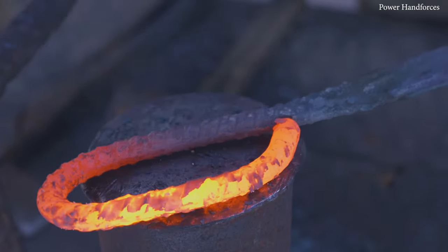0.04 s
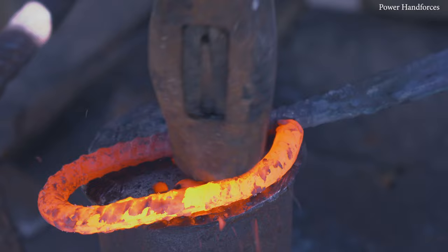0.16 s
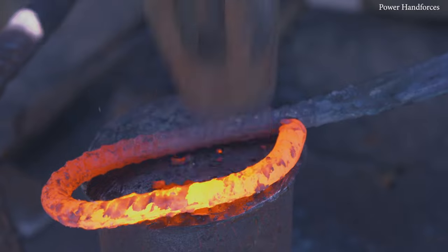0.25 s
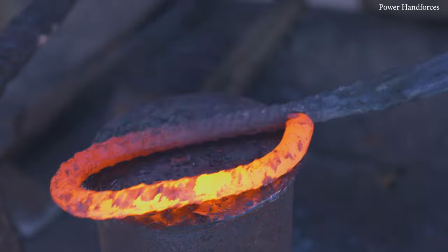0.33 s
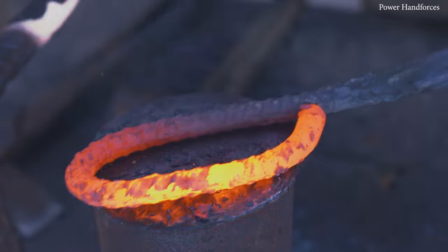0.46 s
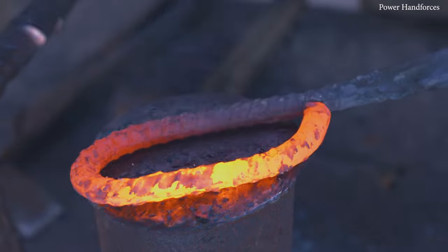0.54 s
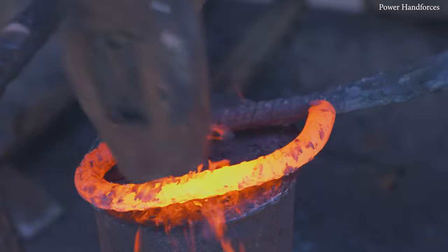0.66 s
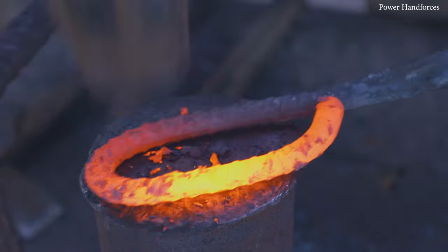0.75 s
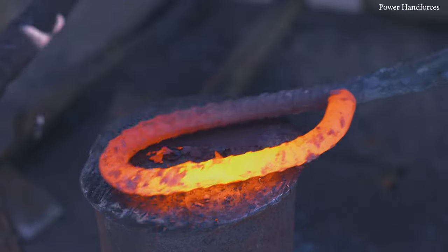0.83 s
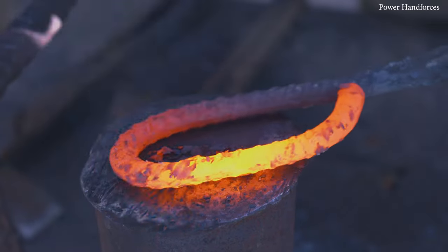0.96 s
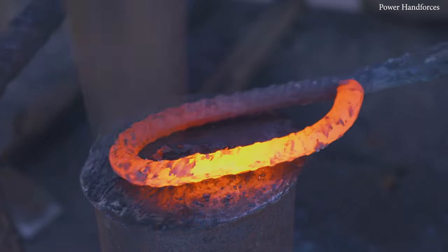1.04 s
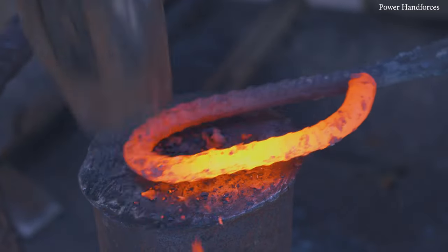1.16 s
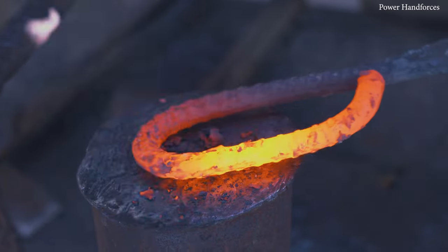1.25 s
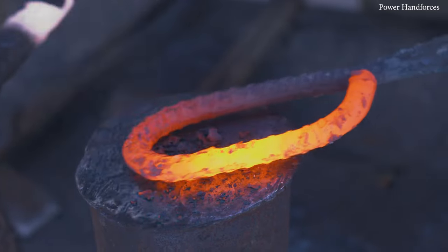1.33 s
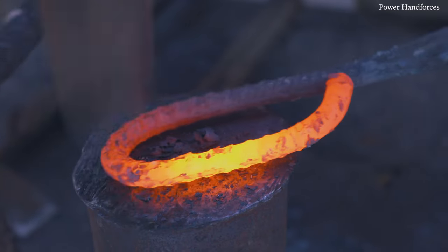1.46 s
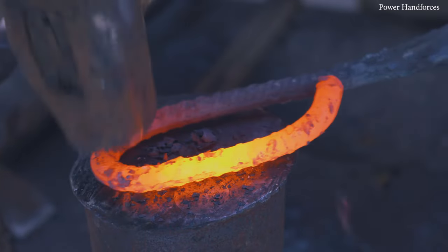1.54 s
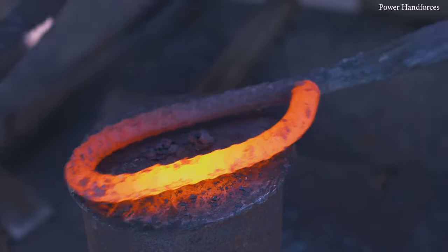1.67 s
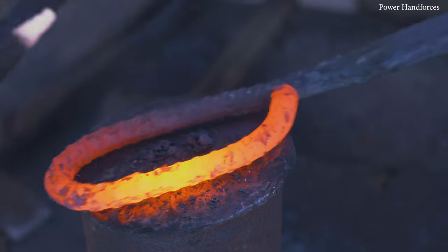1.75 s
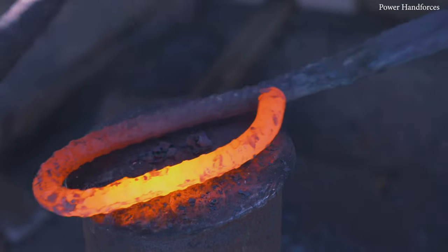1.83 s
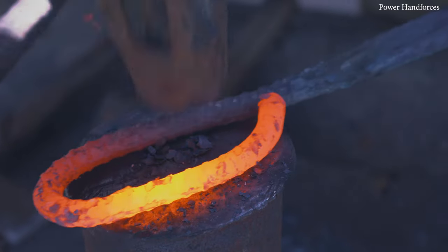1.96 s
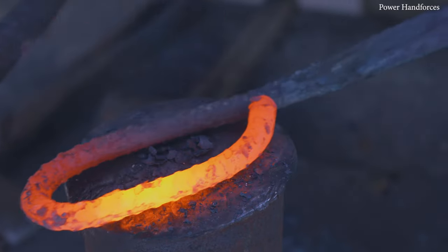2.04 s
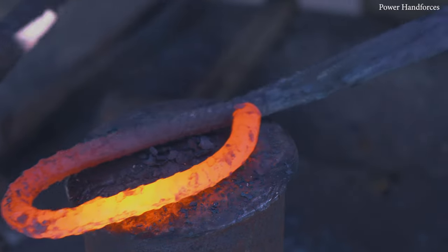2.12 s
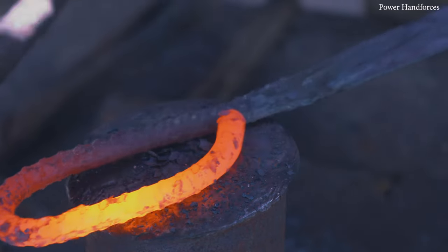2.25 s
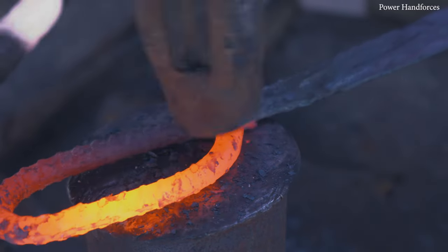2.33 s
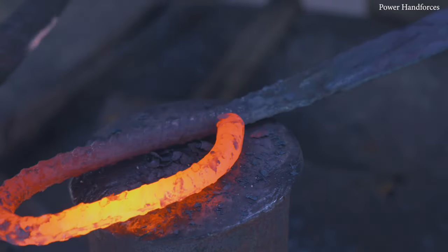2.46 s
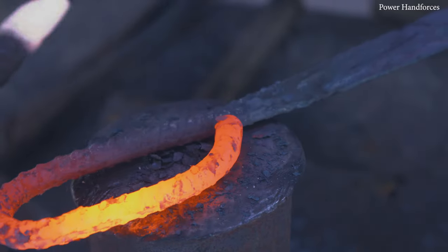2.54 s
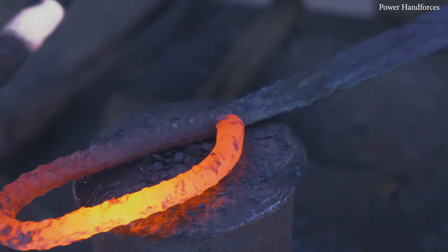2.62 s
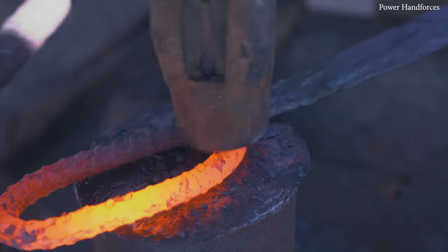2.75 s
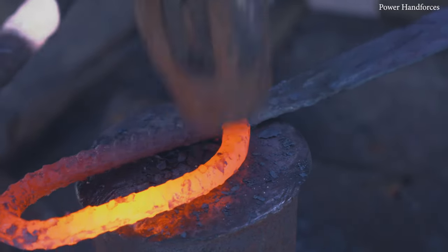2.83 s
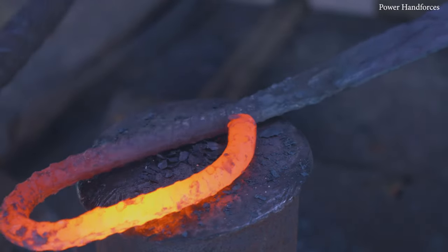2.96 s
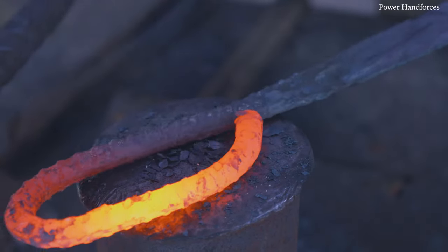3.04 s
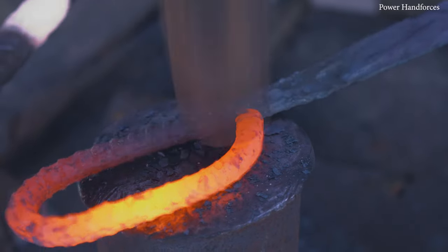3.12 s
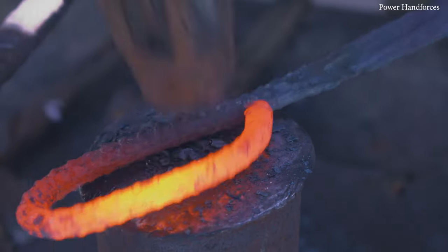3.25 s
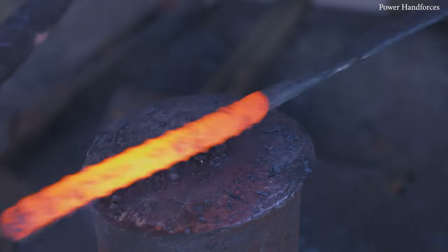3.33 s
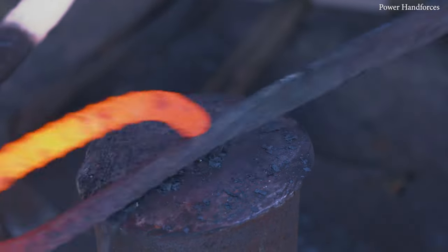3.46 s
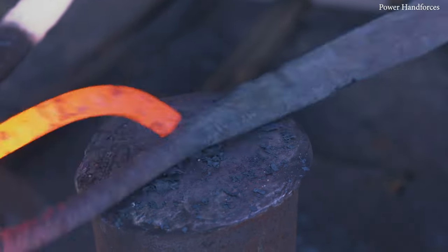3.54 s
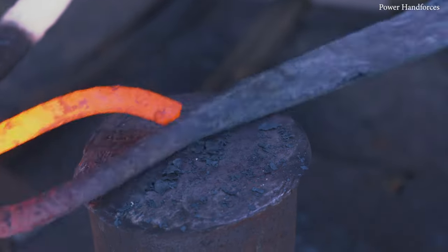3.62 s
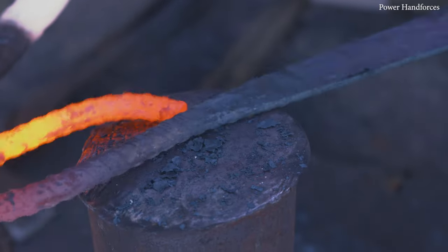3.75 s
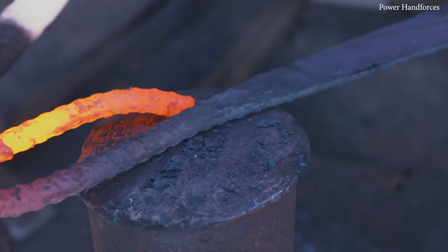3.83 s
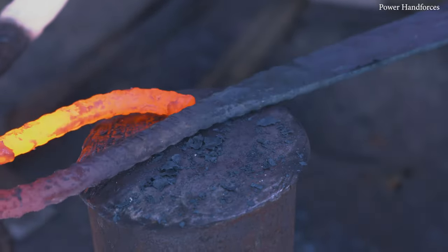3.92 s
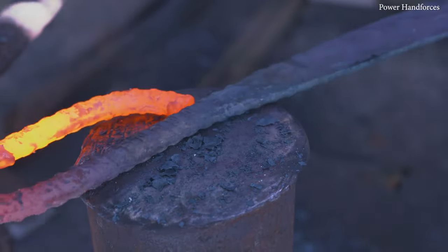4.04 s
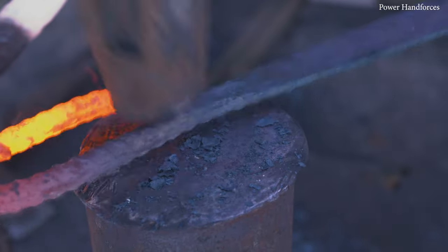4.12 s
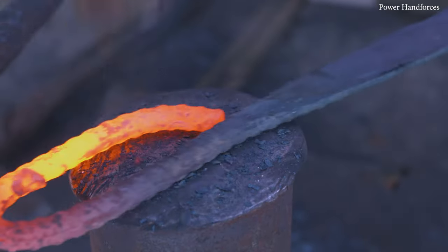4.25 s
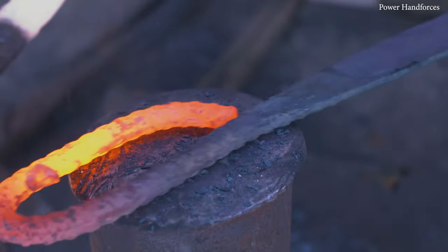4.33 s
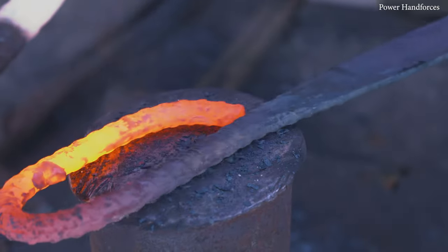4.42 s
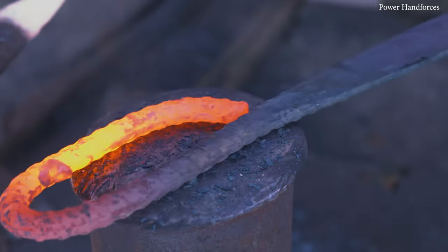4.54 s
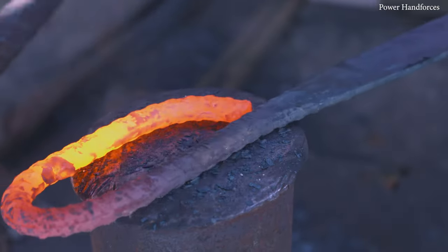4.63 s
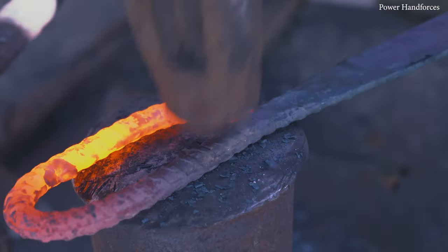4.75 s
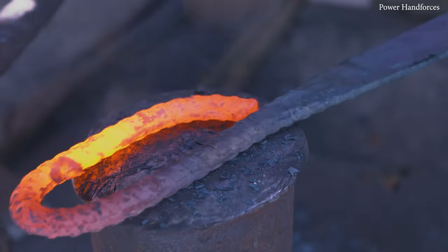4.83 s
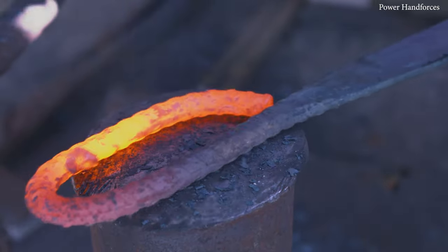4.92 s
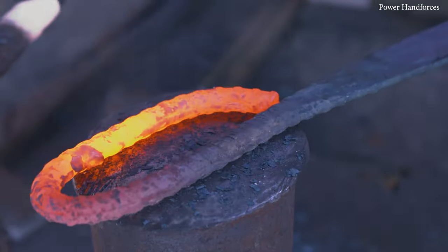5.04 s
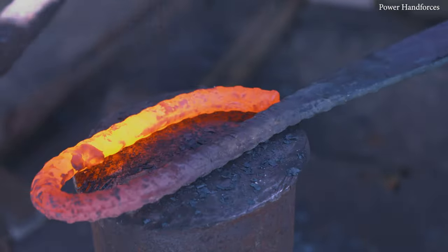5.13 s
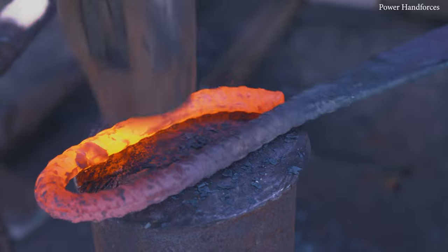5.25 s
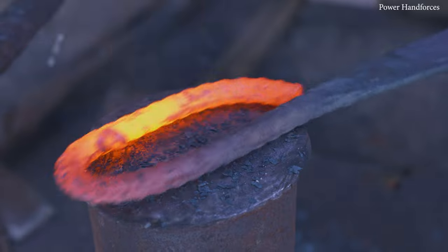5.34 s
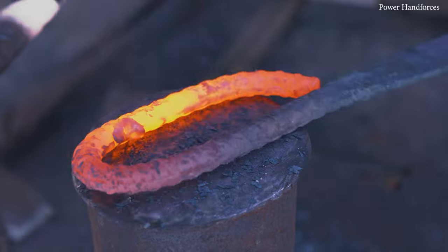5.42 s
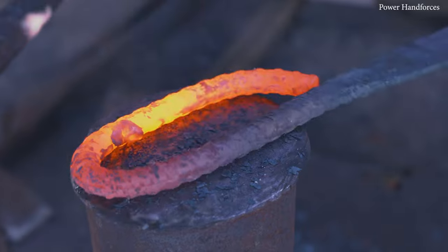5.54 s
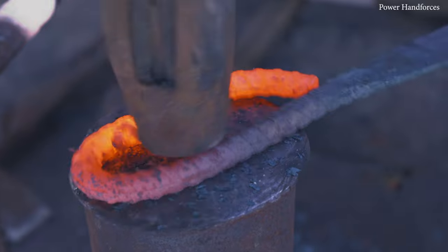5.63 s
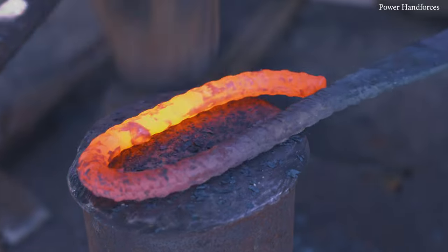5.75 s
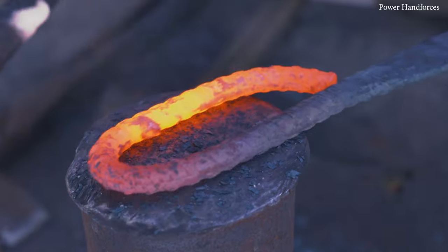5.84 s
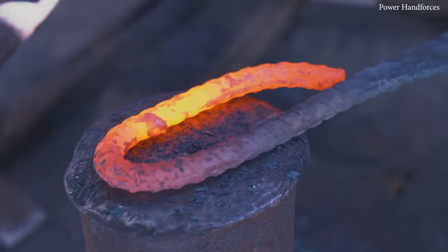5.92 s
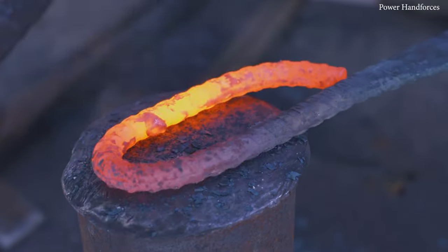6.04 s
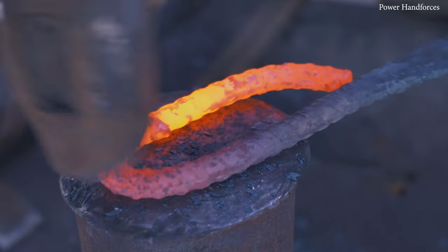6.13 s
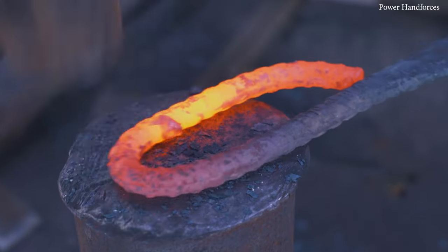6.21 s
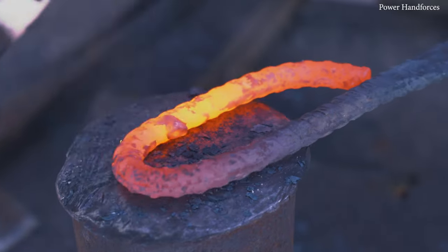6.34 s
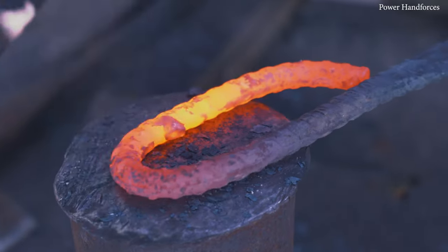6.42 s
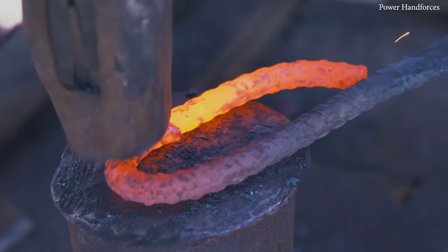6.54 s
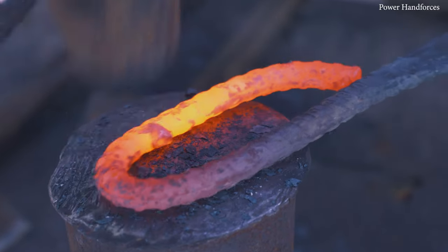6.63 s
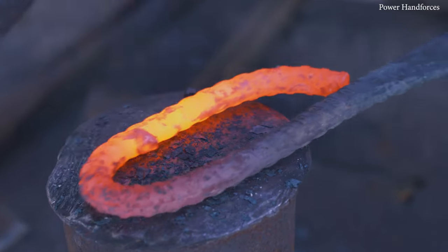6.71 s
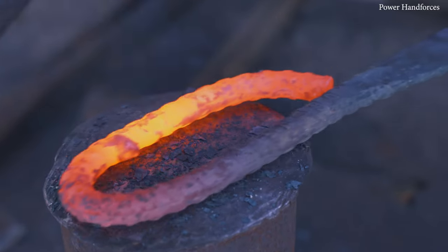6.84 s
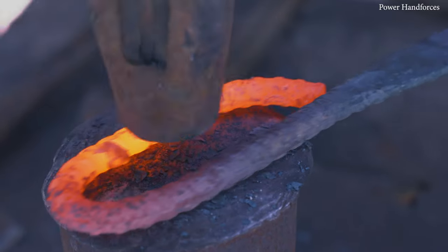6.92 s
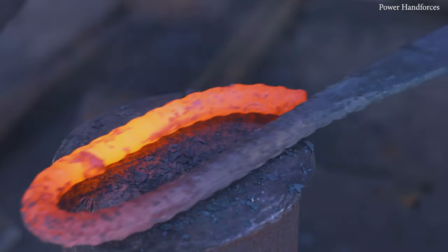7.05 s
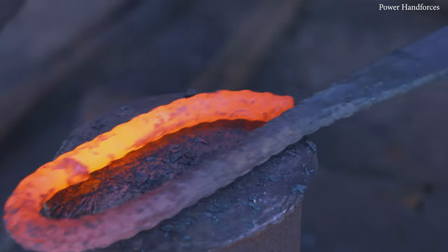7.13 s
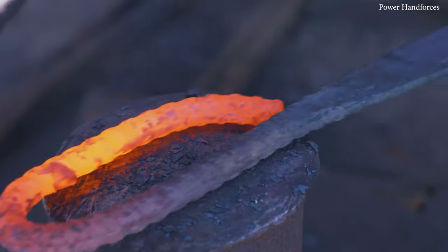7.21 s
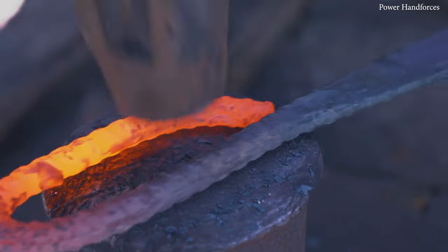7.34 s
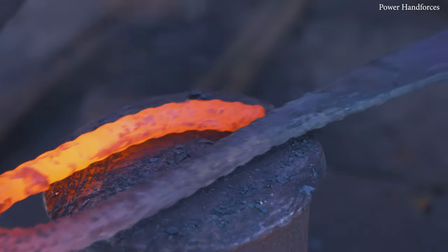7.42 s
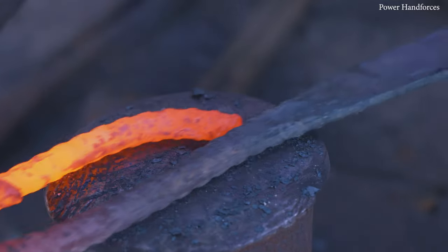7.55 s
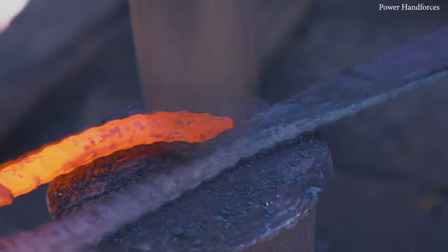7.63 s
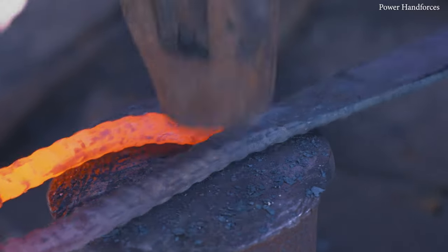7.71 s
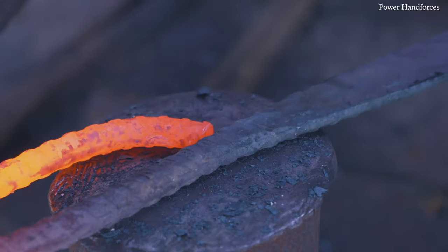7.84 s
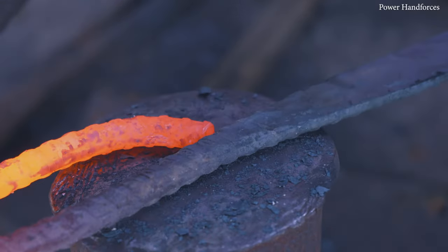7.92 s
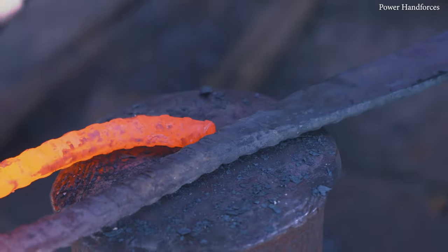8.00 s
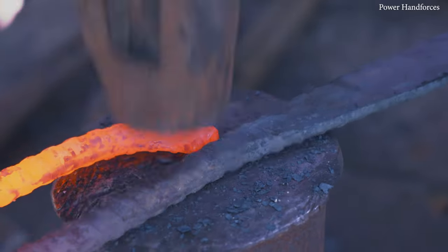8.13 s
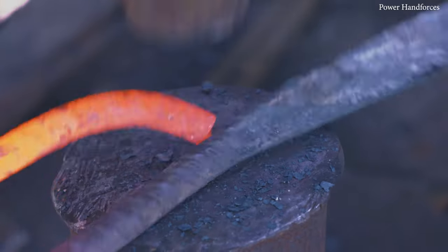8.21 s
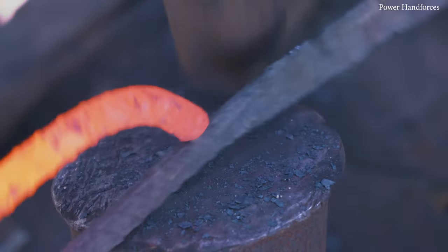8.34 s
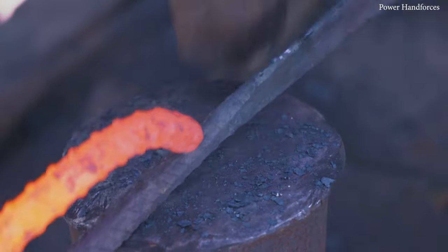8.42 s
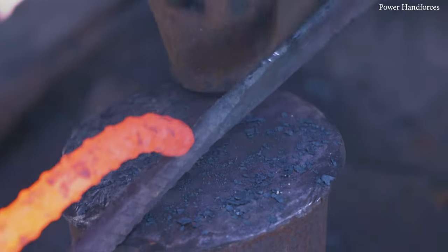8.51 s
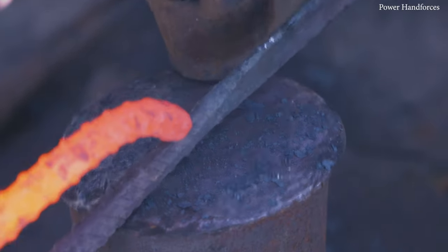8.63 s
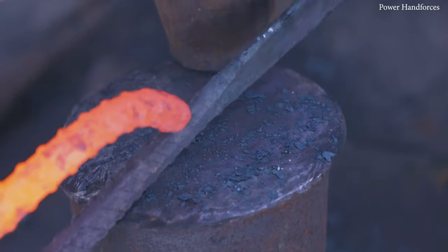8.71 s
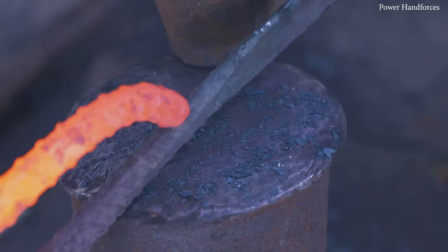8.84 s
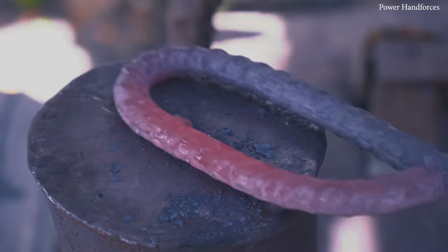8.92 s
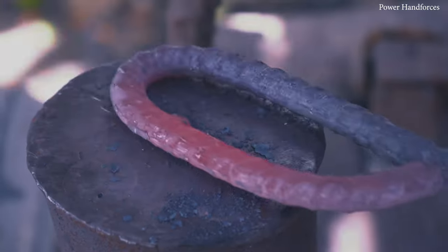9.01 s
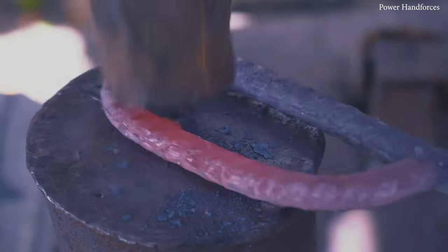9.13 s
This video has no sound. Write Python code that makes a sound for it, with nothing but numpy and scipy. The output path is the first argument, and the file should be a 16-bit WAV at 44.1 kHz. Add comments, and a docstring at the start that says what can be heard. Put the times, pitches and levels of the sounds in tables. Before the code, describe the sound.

Close up, a hand hammer beats a glowing steel loop on a solid iron stake, a little over two blows a second. Each is a hard crack with a short metallic clang, low thud and bright wash under a shed roof. The bar rattles and scrapes between blows, with one longer pause when it is turned. Three quick clinks of cold steel follow, then a soft fading noise over faint yard air and insects.

```python
"""A faint tone slides down as a hand hammer begins to flatten a red-hot steel loop on a round stake under a shed roof.
Each blow is a noise crack plus damped modes; diffuse reverberation turns it into a bright wash, with a low thud.
Between blows the bar rattles in bursts of filtered grit, knocks as damped tones, and loose scale hisses.
Near the end the cold shank clinks three times, then a broad noise wash sets in abruptly and sinks.
Distant yard noise and a fluttering narrow band of insects, both filtered noise, last throughout."""
import sys
import numpy as np
from scipy import signal
from scipy.fft import rfft, irfft, next_fast_len
from scipy.io import wavfile
from scipy.ndimage import uniform_filter1d

SR = 44100
rng = np.random.default_rng(int(sys.argv[2]) if len(sys.argv) > 2 else 0)


def digitize_waveform(pressure):
    """Quantize a signal to 16-bit integers and store it at the path in sys.argv[1].

    Rows of a 2-D input are taken as channels; values are limited to [-1, 1].
    """
    field = np.atleast_2d(pressure).T
    bounded = np.clip(field, -1, 1)
    quanta = np.round(bounded * 32767).astype(np.int16)
    wavfile.write(sys.argv[1], SR, quanta)


N = 404397
SPAN = 24576  # longest single response, in samples
LOW_CUT_HZ = 150

# The bar rattles and scrapes on the stake. Each row: start in seconds, level in dB, brightness in dB per octave.
RATTLE_EVENTS = [(0.487, -46, -0.5), (0.527, -39, -0.7), (0.944, -38.5, 2), (0.987, -32, -1.5),
                 (1.007, -31.5, 2.5), (1.046, -26, 2.2), (1.085, -32.5, 0), (1.4332, -42.5, 3),
                 (1.467, -44.5, 1), (1.5301, -33, 1.5), (1.9551, -34, -1), (1.9705, -38.5, 7),
                 (3.3209, -30, -5.5), (3.69, -45, 0.6), (3.726, -45, 0.5), (3.8, -51.5, 5),
                 (3.8876, -43.5, 1.5), (3.929, -47.5, 0.6), (4.015, -53, 2), (4.3185, -21, -3.5),
                 (4.596, -48.5, 3.5), (4.6259, -48, -0.7), (4.668, -48, -4), (4.708, -47, -2.5),
                 (5.483, -42, -1), (5.519, -43.5, 0.5), (5.644, -68, 3), (6.903, -47.5, 3),
                 (7.278, -51.5, -1), (7.645, -47.5, 0.6), (8.0218, -53.5, 3), (8.2207, -22.5, 0.5),
                 (8.778, -55, 7)]
# Spectrum of grit and scale. Each row: frequency in Hz, relative level in dB.
GRIT_SPECTRUM = [(350, -57), (600, -8), (814, -15.5), (1720, -6.5), (2210, -4.5), (7800, -1),
                 (15200, -21.5), (15800, -8), (16500, -68)]


def blows():
    """Impact on hot steel: a brighter blow glances off harder steel, with less thud and a longer wash."""
    # Each row: start in seconds, crack energy in dB, wash level in dB, clang centre in Hz,
    # brightness in dB per octave.
    blow_rows = [(0.26, 6, -26, 7260, -0.5), (0.773, 11, -25.5, 3150, -1.86), (1.213, 7, -25.5, 5420, 0),
                 (1.629, 5, -22.5, 5250, 0.5), (2.019, 10.5, -22, 3160, 5.5), (2.434, 8, -26.5, 7560, 0),
                 (2.883, 14, -23, 6750, 1.5), (3.284, 9.5, -25, 6890, -0.5), (4.257, 10.5, -20.5, 7240, 1),
                 (4.813, 7, -23, 7000, 1.5), (5.3, 10.5, -25, 6380, 2.5), (5.768, 10, -21.5, 5985, 2.5),
                 (6.231, 10.5, -24, 5460, 1), (6.644, 7.5, -24, 6740, 2.5), (7.031, 7, -31, 5870, -1),
                 (7.405, 9, -26.5, 7120, 3), (7.792, 9, -24, 6230, 3), (8.189, 8.5, -22.5, 6340, 6)]
    # Spectrum of the hot blow. Each row: frequency in Hz, relative level in dB.
    hot_spectrum = [(59, -41), (100, -15), (262, -16.5), (331, 2), (376, -7.5), (655, -4.5), (1680, -11),
                    (2210, -4), (2800, -8.5), (7170, -7), (13600, -33), (15100, -38), (16500, -60)]
    # Modes of hammer and stake. Each row: frequency in Hz, relative level in dB, undamped t60 in seconds.
    stake_modes = [(2040, -17, 0.44), (2218, -6, 0.36), (4150, -9, 0.15), (5030, -5, 0.63),
                   (5180, 3.5, 0.16), (5547, 9.5, 0.34), (6000, -19, 0.14), (5960, 10, 0.15),
                   (6306, 6, 0.26), (6200, -19, 0.15), (6770, 10.5, 0.14), (7000, -12, 0.14),
                   (7200, -19, .22), (7380, 0, 0.14), (7470, -0.5, 0.27), (7640, -13, 0.19),
                   (8170, -11, 0.14), (8470, -8, 0.12), (9300, -5, 0.098), (9600, -23, 0.18),
                   (10360, -18, 0.13), (11700, -19, 0.15), (13200, -27, .15)]
    events = []
    for s, crack_db, wash_db, centre_hz, bright in blow_rows:
        thud_db = -10 - 0.9 * bright
        thud_db += 0.44 * (wash_db + 23.5)  # a weaker blow thuds less
        loop_db = wash_db - 11.5
        decay = 0.96 + 0.053 * bright  # factor on the shed's decay times
        events.append((s, crack_db, wash_db, thud_db, loop_db, centre_hz, bright, decay))
    return strikes(events, hot_spectrum, stake_modes, ring_db=-4.5, damping=0.13,
                   direct_ring_db=21, scatter_db=5)


def clinks():
    """Modal ringing of cold steel: the shank drops and bounces, ringing around the same centre each time."""
    # Each row: start in seconds, crack energy in dB, wash level in dB, thud level in dB,
    # brightness in dB per octave.
    clink_rows = [(8.494, 11, -22, -12, 2), (8.595, 12, -26, -16, 0.1), (8.647, 4.5, -32, -17.5, -1.8)]
    # Spectrum of the cold impact. Each row: frequency in Hz, relative level in dB.
    cold_spectrum = [(59, -46), (100, -8), (324, -6), (1680, -2.5), (1990, -1.5), (2520, -1.5), (4680, -8),
                     (7480, -22), (11000, -55), (13600, -35), (16500, -88)]
    # Modes of cold flat steel. Each row: frequency in Hz, relative level in dB, undamped t60 in seconds.
    shank_modes = [(1480, -19, 0.16), (1800, -13, 0.098), (1950, -0.5, 0.18), (1980, -4, 0.087),
                   (2510, -14, .1), (2860, -20, 0.13), (3270, -15, .12), (3780, -8, .15), (4730, 3, 0.16),
                   (4870, -6, 0.2), (5630, 0.5, 0.21), (7300, -1, 0.28), (8080, -6, 0.21),
                   (9200, -12.5, 0.19), (12220, -24, .15), (13200, -16, .2)]
    centre_hz, decay = 1970, 0.66
    events = [(s, crack_db, wash_db, thud_db, wash_db - 24, centre_hz, bright, decay)
              for s, crack_db, wash_db, thud_db, bright in clink_rows]
    return strikes(events, cold_spectrum, shank_modes, ring_db=-6.5, damping=0.4,
                   direct_ring_db=29.5, scatter_db=3.0)


def strikes(events, spectrum, modes, ring_db, damping, direct_ring_db, scatter_db):
    """Superposition of paths: crack and ring arrive directly, ring and clang through the shed, thud below."""
    # Modes of the bent bar. Each row: frequency in Hz, relative level in dB, undamped t60 in seconds.
    loop_modes = [(2684, -7, 0.24), (2780, -32, 0.16), (3168, 9, 0.19), (3420, -5, 0.16), (3645, 5, 0.25)]
    track = np.zeros((2, N + 2 * SPAN))
    for s, crack_db, wash_db, thud_db, loop_db, centre_hz, bright, decay in events:
        struck = emphasised(modes, centre_hz)
        ring = amp(wash_db + ring_db) * ringing(struck, damping, scatter_db)
        ring += amp(loop_db) * ringing(loop_modes, 0.21, scatter_db=2.5)
        # first touch comes 1 ms ahead, so the full blow falls on s
        add(track, s - .001, amp(crack_db) * crack(spectrum, bright + 2.5))
        add(track, s, amp(direct_ring_db) * ring[None])

        into_shed = ring.copy()
        shock = clang(spectrum, bright, centre_hz)
        into_shed[:len(shock)] += amp(wash_db) * shock
        wash = signal.fftconvolve(shed(decay, build_s=.009), into_shed[None], axes=1)
        add(track, s, wash)
        add(track, s, amp(thud_db) * thud())
    return track[:, :N]


def crack(spectrum, tilt_db):
    """Impulsive contact noise: each arrival is a sharp onset decaying with a 0.5 ms time constant."""
    # First touch, full blow, then floor and nearest post answer. Each row: delay in seconds, level in dB.
    arrivals = [(0, -18), (.001, 0), (.0026, -4), (.004, -11)]
    t = np.arange(1024) / SR
    shape = sum(amp(db) * (t >= delay) * np.exp(-np.abs(t - delay) / .0005) for delay, db in arrivals)
    contact = noise_pair(1024, flat) * shape
    contact /= np.linalg.norm(contact)
    return signal.fftconvolve(contact, causal(spectrum, tilt_db)[None], axes=1)


def clang(spectrum, tilt_db, centre_hz):
    """High modal density acts as decaying noise: a plain shock with countless short modes of the steel."""
    t = np.arange(1024) / SR
    shiver = rng.standard_normal(len(t)) * amp(-60 * t / 0.017)  # t60 of 17 ms, new at each strike
    shiver /= np.linalg.norm(shiver)
    shiver[0] += 1.4  # the plain shock
    shiver /= np.linalg.norm(shiver)
    return signal.fftconvolve(causal(spectrum, tilt_db, centre_hz, lift_db=4.5), shiver)


def emphasised(modes, centre_hz):
    """Selective excitation: modes near the clang centre are struck up to 8 dB harder."""
    return [(hz, db + 8 * np.exp(-(np.log2(hz / centre_hz) / 0.16) ** 2), t60) for hz, db, t60 in modes]


def ringing(modes, damping, scatter_db):
    """Modal synthesis: damped sines start together, with scattered strengths and pitches; energy about 1."""
    hz, db, t60 = np.transpose(modes)[:, :, None]
    t = np.arange(SPAN // 3) / SR
    t60 = damping * t60
    energy = np.sum(amp(2 * db) * t60) * SR / (4 * np.log(1000))
    size = amp(db) / np.sqrt(energy)
    size = size * amp(rng.normal(0, scatter_db, hz.shape))
    hz = hz * (1 + 0.0014 * scatter_db * rng.standard_normal(hz.shape))
    return np.sum(size * amp(-60 * t / t60) * np.sin(2 * np.pi * hz * t), axis=0)


def thud():
    """Discrete reflections: the footing knocks, and walls return it with a softened start."""
    # Modes of the stake's footing. Each row: frequency in Hz, relative level in dB, undamped t60 in seconds.
    footing_modes = [(193.4, -3, 0.089), (257, -15.5, 0.18), (322.9, 0.5, 0.17), (472.4, -15.5, 0.2),
                     (548.4, -4.5, 0.097), (650.5, -2, 0.067)]
    # Returns from the walls. Each row: delay in seconds, level in dB relative to the knock.
    wall_returns = [(.017, 6), (.037, 4), (.0767, -1), (.095, -5), (.13, -7), (.19, -17), (.24, -27)]
    knock = ringing(footing_modes, 0.93, scatter_db=0.73)
    soft = knock * (1 - np.exp(-np.arange(len(knock)) / SR / 0.0039))
    sound = np.zeros((2, SPAN))
    add(sound, 0, knock[None])
    for delay, db in wall_returns:
        add(sound, delay, amp(db) * soft[None])
    return sound


def shed(decay, build_s, count=SPAN):
    """Diffuse reverberation: echoes thicken, then each frequency dies exponentially at its own speed."""
    # Decay of the shed before the decay factor. Each row: frequency in Hz, t60 in seconds.
    shed_decay = [(100, 0.96), (300, 1), (700, 0.42), (1800, 0.28), (5000, 0.31), (9000, 0.25),
                  (14000, 0.19)]

    def gain(hz, s):
        diffuse = hz ** 2 / (hz ** 2 + 520 ** 2)  # the bass comes back in a few plain echoes instead
        early = amp(-60 * s / (decay * along(shed_decay, hz)))
        late = amp(-16.5) * amp(-60 * s / 0.66)  # a weak, slower answer from the yard
        return diffuse * (early + late)

    build_up = np.clip(np.arange(count) / SR / build_s, 0, 1) ** 1.4
    return noise_pair(count, gain) * build_up


def rattles():
    """Friction noise: bar and scale scrape in short bursts of grit, heard directly and through the shed."""
    track, t = np.zeros((2, N + 2 * SPAN)), np.arange(4096) / SR
    chances = rng.random((round(1.5 * N / SR), 3))  # 1.5 faint rattles per second, at chance times
    faint = [(u * N / SR, -54 + 8 * v, 8 * w - 4) for u, v, w in chances]
    for s, db, tilt_db in RATTLE_EVENTS + faint:
        envelope = np.exp(-t / .011) * (1 - np.exp(-t / 0.0019))  # decay and rise in seconds
        grit = rng.standard_normal(len(t)) * envelope
        grit = signal.fftconvolve(grit, causal(GRIT_SPECTRUM, tilt_db))
        room = shed(0.78, build_s=0.0036, count=SPAN // 2) * amp(-27.0)
        room[:, 0] += 1  # the direct path
        add(track, s, amp(db) * signal.fftconvolve(room, grit[None], axes=1))
    return track[:, :N]


def ticks():
    """Single-mode decay: each small ping or knock of the shifting bar is one damped tone."""
    # Each row: start in seconds, frequency in Hz, level in dB, t60 in seconds.
    tick_rows = [(4.02, 867, -62.5, 0.38), (4.609, 4160, -42, 0.022), (4.712, 2230, -51, 0.16),
                 (4.807, 4430, -33, .01), (6.1, 4300, -52.5, 0.047), (6.577, 2800, -48, .015),
                 (8.78, 4500, -48, 0.025), (8.785, 522, -39.5, 0.041), (8.85, 1150, -64, .6),
                 (8.903, 4200, -29, 0.0036)]
    track, t = np.zeros((2, N + SPAN)), np.arange(SPAN // 2) / SR
    for s, hz, db, t60 in tick_rows:
        envelope = amp(db - 60 * t / t60) * (1 - np.exp(-t / 0.001))
        add(track, s, (envelope * np.sin(2 * np.pi * hz * t))[None])
    return track[:, :N]


def scale_hiss():
    """Broadband friction noise: thin, patchy hiss whose level follows the loose scale."""
    hiss = coloured(noise_pair(N, flat, patchy_db=5.5),
                    lambda hz: amp(along(GRIT_SPECTRUM, hz)) * hz / (hz + 6000))
    return scale_level() * unit(hiss)


def scale_level():
    """Power addition of swells: scale hisses while the bar is shifted about, around every listed rattle."""
    t = np.arange(0, N / SR, .01)
    s, db, _ = np.transpose(RATTLE_EVENTS)[:, :, None]
    peak_db = -69 + 0.12 * (db + 40)  # -69 dB beside a rattle of -40 dB
    swells = amp(peak_db) * np.exp(-((t - s) / 0.15) ** 2)
    level = np.sqrt(np.sum(swells ** 2, axis=0)) + amp(-80)  # the last term is the hiss at rest
    return np.interp(np.arange(N) / SR, t, level)


def fading():
    """Exponential decay of filtered noise: a broad wash starts at once and sinks."""
    # Start in seconds, starting level in dB, slope in dB per second.
    fade_course = (8.952, -51.5, -16)
    # Spectrum of the wash. Each row: frequency in Hz, relative level in dB.
    wash_spectrum = [(35, -39), (60, -15), (326, -7.5), (2140, -8), (2700, -5.5), (13000, -25.5),
                     (16500, -36)]
    # Brighter bands in it. Each row: centre in Hz, Gaussian half-width in Hz, lift in dB.
    bright_bands = [(2660, 92, 5), (4000, 120, 8)]
    start, db, db_per_s = fade_course
    t = np.arange(N) / SR - start

    def response(f):
        lift = sum(up_db * np.exp(-((f - hz) / width_hz) ** 2) for hz, width_hz, up_db in bright_bands)
        return amp(along(wash_spectrum, f) + lift)

    wash = unit(coloured(noise_pair(N, flat), response))
    return (t > 0) * amp(db + db_per_s * np.maximum(t, 0)) * wash


def whistle():
    """Phase is the integral of frequency: one faint tone, already under way at the opening, slides down."""
    # Start in seconds, end in seconds, first frequency in Hz, last frequency in Hz, level in dB.
    glide = (-1, .235, 4052, 800, -77)
    start, end, from_hz, to_hz, db = glide
    u = np.clip((np.arange(N) / SR - start) / (end - start), 0, 1)
    envelope = amp(db) * np.sqrt(np.abs(np.sin(np.pi * u)))
    phase = 2 * np.pi * np.cumsum(from_hz + (to_hz - from_hz) * u) / SR
    return envelope * np.sin(phase)


def yard():
    """Subtractive synthesis: distant noise and a narrow, fluttering band of insects are shaped from noise."""
    # Each row: time in seconds, yard level in dB, insect level in dB.
    yard_levels = [(0, -57.5, -65), (1.4, -53.5, -70), (2.07, -52.5, -65), (2.81, -60.5, -66),
                   (3.52, -59, -62), (4.26, -59.5, -59), (5.0, -58.5, -66), (5.87, -62, -59),
                   (6.61, -62.5, -72), (7.69, -57.5, -65), (8.25, -66.5, -77.5), (8.5, -61.5, -67),
                   (9.17, -62.5, -73)]
    # Spectrum of the yard noise. Each row: frequency in Hz, relative level in dB.
    air_spectrum = [(15, -65), (25, -27), (111, -10), (389, -8), (687, -6), (1280, -9.5), (2150, -6.5),
                    (2530, -8), (2980, -6), (3410, -10.5), (6920, -9), (7920, -2.5), (9080, -19.5),
                    (15200, -22), (16500, -47)]
    # Band of the insects: centre in Hz, Gaussian half-width in Hz.
    insect_band = (7740, 430)
    s, yard_db, insects_db = np.transpose(yard_levels)
    t = np.arange(N) / SR
    far = unit(coloured(noise_pair(N, flat, patchy_db=4.0), lambda hz: amp(along(air_spectrum, hz))))
    centre_hz, width_hz = insect_band
    insects = unit(coloured(noise_pair(N, flat, patchy_db=5.5),
                            lambda hz: np.exp(-((hz - centre_hz) / width_hz) ** 2)))
    return amp(np.interp(t, s, yard_db)) * far + amp(np.interp(t, s, insects_db)) * insects


def noise_pair(count, gain, patchy_db=0):
    """Interchannel coherence: mid and side noise mix to a set likeness per frequency, times gain(Hz, s)."""
    # Left-right likeness. Each row: frequency in Hz, correlation from 0 to 1.
    likeness = [(60, 0.88), (130, 1.0), (290, 1), (640, 0.86), (1410, 0.52), (3100, 0.019), (6820, 0.28),
                (15000, 0.096)]
    hz, t, z = signal.stft(rng.standard_normal((2, count)), SR, nperseg=256)
    field = uniform_filter1d(rng.standard_normal(z.shape[1:]), size=3, axis=0)
    field = uniform_filter1d(field, size=16, axis=1)  # patches in frequency and time
    turn = np.arccos(np.clip(along(likeness, hz), -1, 1))[:, None] / 2
    weights = np.array([np.cos(turn), np.sin(turn)])
    mid, side = z * weights * gain(hz[:, None], t) * amp(patchy_db * unit(field))
    return signal.istft(np.array([mid + side, mid - side]), SR, nperseg=256)[1][:, :count]


def flat(hz, s):
    """White noise has the same gain at every frequency and time."""
    return 1


def causal(spectrum, tilt_db=0, centre_hz=4000, lift_db=0):
    """Minimum phase by folding the cepstrum: an impulse of energy 1, tilted about 4 kHz, lifted at a centre."""
    hz = np.fft.rfftfreq(2048, 1 / SR)
    db = along(spectrum, hz) + tilt_db * np.log2((hz + 50) / 4000)
    db += lift_db * np.exp(-(np.log2((hz + 1) / centre_hz) / 0.31) ** 2)
    cepstrum = irfft(np.log(amp(np.maximum(db, -70))))
    cepstrum[1:1024] *= 2
    cepstrum[1025:] = 0
    pulse = irfft(np.exp(rfft(cepstrum)))
    return pulse / np.linalg.norm(pulse)


def coloured(x, response):
    """Linear filtering: the spectrum of x is multiplied by a response of frequency."""
    m = next_fast_len(N + SR // 4)
    return irfft(rfft(x, m) * response(np.fft.rfftfreq(m, 1 / SR)), m)[..., :N]


def low_cut(hz, order):
    """High-pass response: cascaded first-order sections thin the deep bass."""
    return (1j * hz / (LOW_CUT_HZ + 1j * hz)) ** order


def along(points, hz):
    """Logarithmic frequency scale: (Hz, value) points are interpolated on it."""
    f, v = np.transpose(points)
    return np.interp(np.log(hz + 1), np.log(f + 1), v)


def amp(db):
    """Decibel law: 20 dB is a factor of ten in amplitude."""
    return 10 ** (np.asarray(db) / 20)


def unit(x):
    """Root-mean-square normalisation to 1."""
    return x / np.sqrt(np.mean(x ** 2) + 1e-20)


def add(track, s, sound):
    """Superposition: a sound is summed into the track at s seconds."""
    start = round(s * SR)
    track[:, start:start + sound.shape[1]] += sound


def scene():
    """Superposition of all sources, with a level difference between the channels for the stake's position."""
    # The stake stands right of the axis. Each row: frequency in Hz, left minus right level in dB.
    lean = [(60, -4), (110, -0.5), (200, 0.5), (380, -0.5), (700, 1), (1290, 0.5), (2380, 0), (4400, -2),
            (8120, -11.5), (15000, 0.5)]
    forge = coloured(blows() + rattles() + ticks(), lambda hz: amp(np.outer([.5, -.5], along(lean, hz))))
    # a low cut at the microphone thins the deep bass of all metal sounds
    metal = coloured(forge + clinks(), lambda hz: low_cut(hz, 3))
    return metal + scale_hiss() + fading() + whistle() + yard()


def record(dry):
    """Soft saturation rounds off the loudest cracks but spares the deep bass; a band limit ends the treble."""
    shaved = dry - dry / (1 + np.abs(dry / .72) ** 4) ** (1 / 4)
    rounded = dry - coloured(shaved, lambda hz: low_cut(hz, 2))
    return coloured(rounded, lambda hz: hz < 16900)


dry = scene()
out = record(dry)
digitize_waveform(out)
```